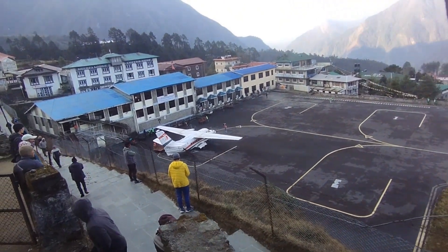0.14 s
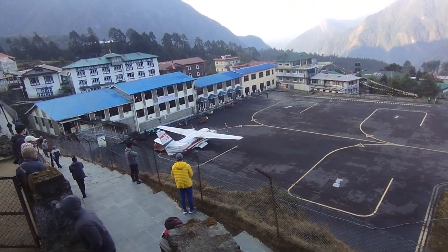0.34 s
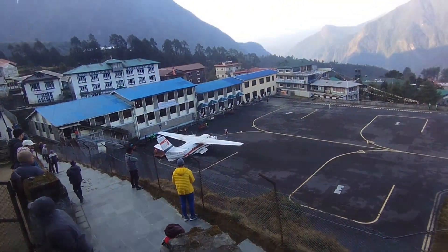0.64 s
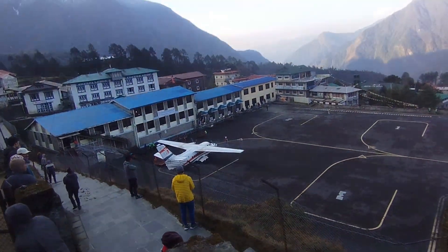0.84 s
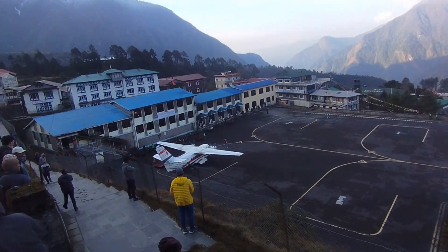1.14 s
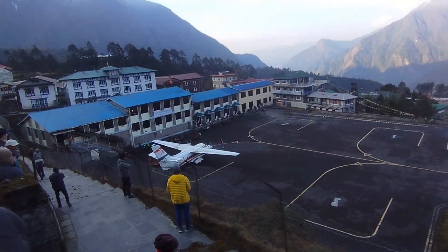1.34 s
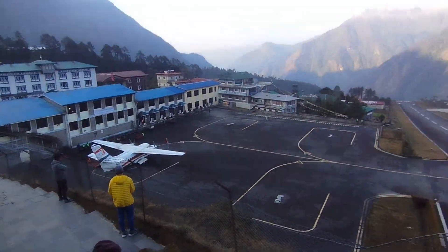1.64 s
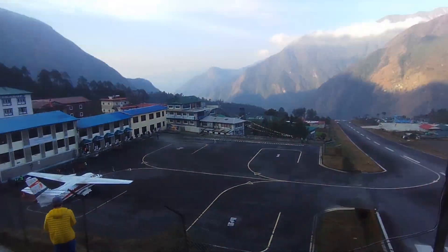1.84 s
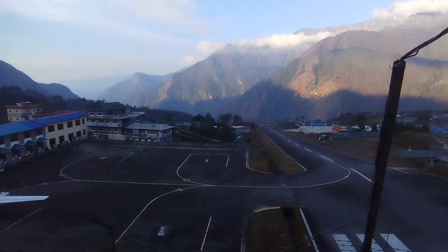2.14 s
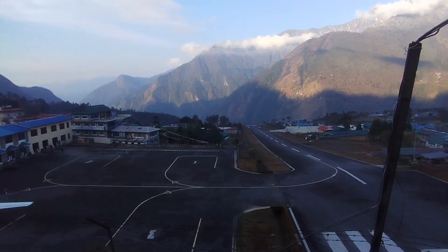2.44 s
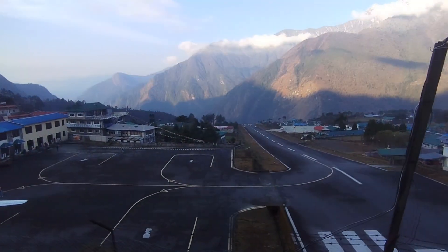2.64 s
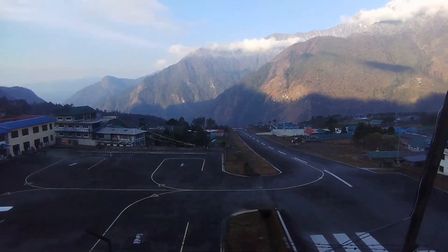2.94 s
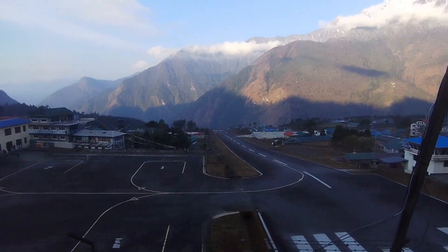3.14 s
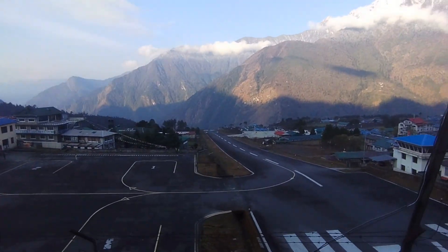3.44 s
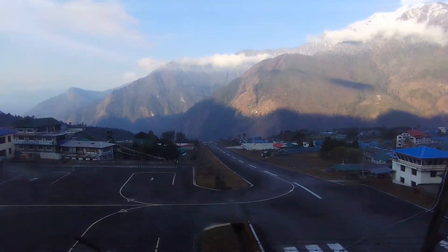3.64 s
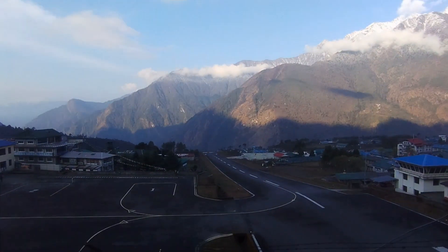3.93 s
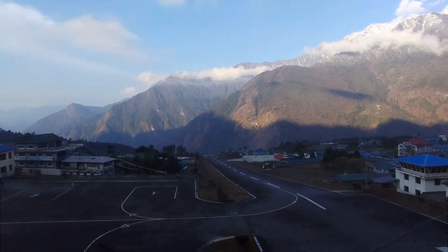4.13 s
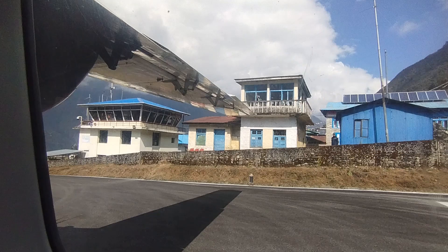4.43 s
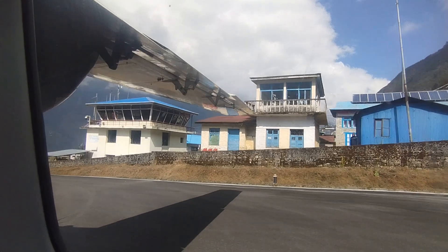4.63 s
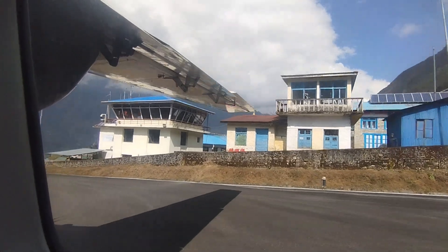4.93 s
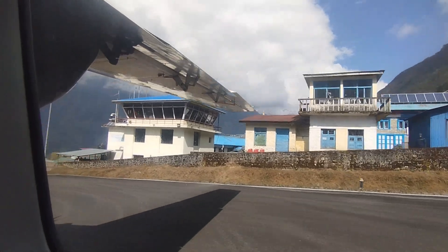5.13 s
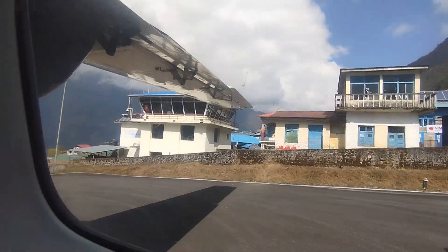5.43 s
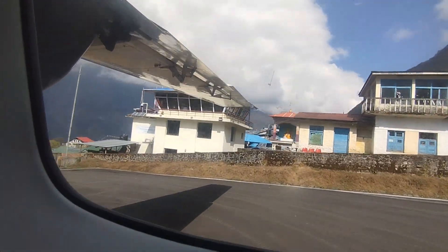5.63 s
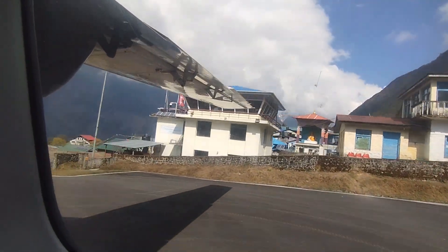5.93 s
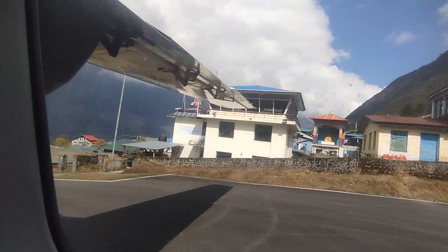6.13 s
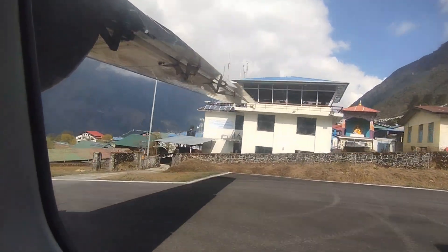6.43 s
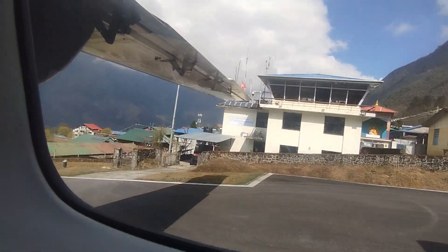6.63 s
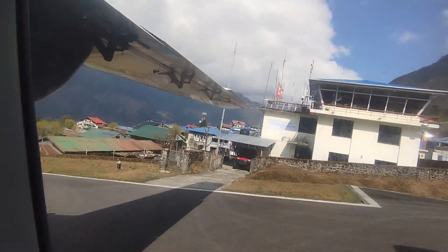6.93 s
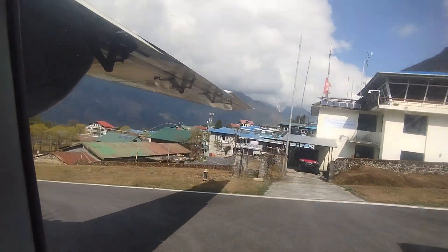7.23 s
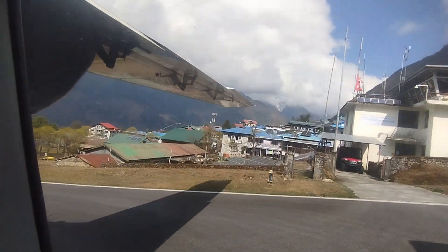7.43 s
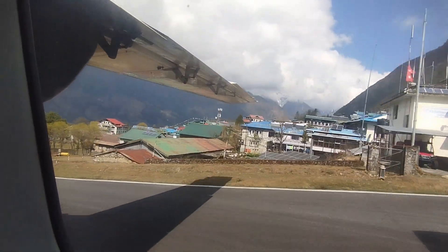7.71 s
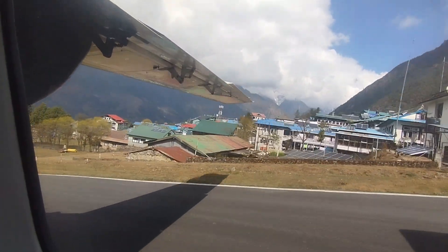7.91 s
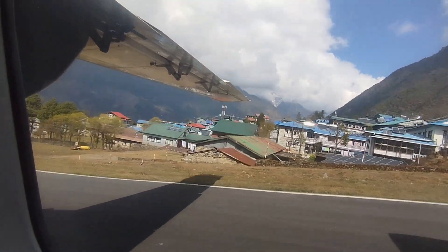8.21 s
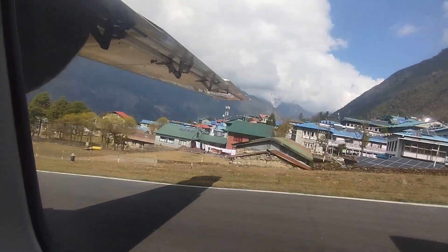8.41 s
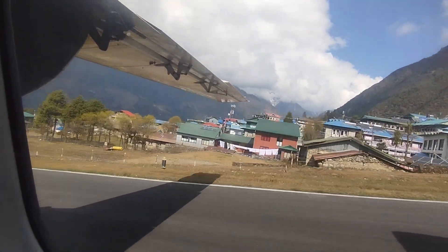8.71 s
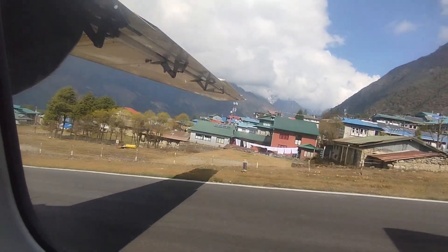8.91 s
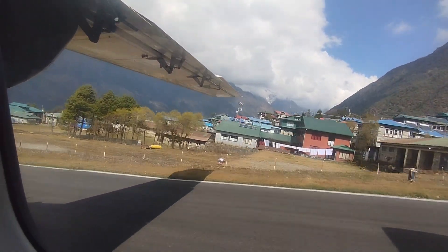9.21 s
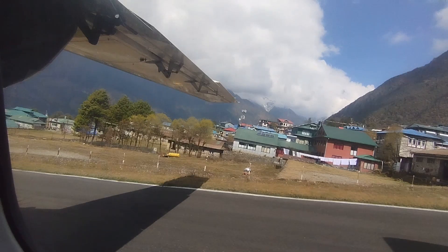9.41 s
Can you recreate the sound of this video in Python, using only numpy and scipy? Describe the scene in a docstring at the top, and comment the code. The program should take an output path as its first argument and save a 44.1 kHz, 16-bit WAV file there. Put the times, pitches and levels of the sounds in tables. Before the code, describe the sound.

A broad rushing aircraft roar on a mountain apron stops dead; after a short gap, deep propeller boom and buzz fill a taxiing cabin.

```python
"""Mountain apron, then a taxiing cabin: one turboprop heard outside and inside, two scenes.
Outside: shaped noise chopped at the blade rate, wavering blade tones and thin turbine lines;
a stereo microphone turns away. After a short silence, inside: sine shaft orders boom and buzz
over low noise, with two ticks near the start. Loud bass overloads the input."""
import sys
import numpy as np
from scipy import signal
from scipy.fft import rfft, irfft
from scipy.io import wavfile
from scipy.ndimage import uniform_filter1d

SR = 44100
rng = np.random.default_rng(int(sys.argv[2]) if len(sys.argv) > 2 else 0)


def pcm_store(signal):
    """Save signal as 16-bit PCM."""
    levels = np.round(np.clip(np.atleast_2d(signal), -1, 1) * 32767)
    wavfile.write(sys.argv[1], SR, levels.astype(np.int16).T)


N = 421596
HOP, FRAME = 512, 2048  # samples
CUT_S, RESUME_S = 4.305, 4.467  # silence between the scenes
EDGE_S = 0.002
BLADES = 5
SHAFT_HZ, OTHER_SHAFT_HZ = 34.27, 34.4  # the other propeller turns a little faster
BASS_LATE_DB, BASS_IN_S = -15, 4.615  # cabin bass is held down until then

T_S = np.arange(N) / SR
FRAME_S = np.arange(N // HOP + 5) * HOP / SR
BIN_HZ = np.fft.rfftfreq(FRAME, 1 / SR)
BIN_COLUMN_HZ = BIN_HZ[:, None]


# Cabin course: time_s, blade_tone_db, airframe_shudder_0_to_1
CABIN_COURSE = [(4.47, -6.5, 0.07), (5.0, -7.5, 0.4), (5.6, -4.5, 0.27), (6.3, -4, 0.83), (6.7, -7.5, 0.93),
                (7.3, -7, 0.77), (8.0, -6, 0.95), (8.6, -8.5, 0.84), (8.9, -4, 0.9), (9.2, -9.5, 0.7),
                (9.56, -7, 0.98)]
# Surges of twice the other blade tone: centre_s, half_length_s, rise_db
OCTAVE_SURGES = [(4.899, 0.14, 2), (5.977, 0.14, 14.5), (7.2, 0.32, 2.5), (7.905, 0.11, 12.5),
                 (8.702, 0.12, 4)]


def propeller_boom():
    """Blade-passing tone and the other propeller's octave, rocking between ports as the two drift."""
    beat_hz, beat_zero_s = 0.62, 5.3
    rock_db, mean_lean_db = 2, 0.4
    rock_rad, mean_lead_rad = 0.1, 0.11
    octave_db = -29.5
    beat = 2 * np.pi * beat_hz * (T_S - beat_zero_s) + 0.58 * wander(0.5)
    lean_db = mean_lean_db - rock_db * np.sin(beat)
    lead_rad = mean_lead_rad + rock_rad * np.cos(beat)
    blade_db = follow(CABIN_COURSE, T_S)[0]
    blade = tone(BLADES * SHAFT_HZ, blade_db, 1.2, 13, 0.24, lean_db, lead_rad)
    octave_db = octave_db + sum(swell(T_S, *row) for row in OCTAVE_SURGES)
    octave = tone(2 * BLADES * OTHER_SHAFT_HZ, octave_db, 2.1, 18.0, 0.21, lean_db, lead_rad)
    return blade + octave


# Low shaft orders in the airframe: shaft_multiple, calm_db, shuddering_db, waver_db
SHAFT_ORDERS = [(.5, -31.5, -31, 3.5), (1, -26.5, -24, -0.5), (2, -22.5, -14.5, 2.5), (3, -29, -12.5, 2),
                (4, -31.5, -23.5, 3.5), (8, -40, -33, 3)]
# Rises and dips of single orders: shaft_order_row, centre_s, half_length_s, rise_db
SHAFT_ORDER_SWELLS = [(0, 8.2, .2, 10), (0, 9.25, .25, 11), (0, 8.3, 0.23, 3.5), (1, 5.2, 0.38, 8.5),
                      (1, 7.3, .8, 7.5), (2, 5.6, 0.34, 7), (2, 6.6, 0.22, 5.5), (2, 9.1, .15, 4.5),
                      (2, 12, .2, -5), (3, 5.6, 0.24, -8.5), (3, 7.9, .2, 3.5), (3, 8.7, .12, 5.5),
                      (3, 9.05, .2, -8.5), (4, 6.5, 0.12, 6.5), (4, 7.5, .3, 6.5)]


def airframe_shudder():
    """Low shaft multiples drum on the skin, moving between calm and shuddering levels."""
    waver_hz, slip_rad, late_ramp_s = 13.0, 0.22, 0.06
    shudder = follow(CABIN_COURSE, T_S)[1]
    late_db = BASS_LATE_DB * np.clip((BASS_IN_S - T_S) / late_ramp_s + 1, 0, 1)
    total = 0
    for row, (multiple, calm_db, hard_db, waver_db) in enumerate(SHAFT_ORDERS):
        level_db = calm_db + (hard_db - calm_db) * shudder + late_db
        level_db = level_db + swells(SHAFT_ORDER_SWELLS, row, T_S)
        total = total + tone(multiple * SHAFT_HZ, level_db, waver_db, waver_hz, slip_rad)
    return total


# Course of the blade buzz: time_s, level_db
BUZZ_LEVEL = [(4.47, -42), (4.8, -31), (5.45, -29), (5.9, -33), (6.3, -39.5), (9.56, -41.5)]
# Its orders: shaft_multiple, relative_db
BUZZ_MULTIPLES = [(15, 0), (20, -9), (25, -10), (40, -23)]


def blade_buzz():
    """High blade multiples of the other propeller, reaching the ports one radian apart."""
    level_db = follow(BUZZ_LEVEL, T_S)[0]
    return sum(tone(multiple * OTHER_SHAFT_HZ, level_db + db, 2.5, 7, 0.28, lead_rad=1.0)
               for multiple, db in BUZZ_MULTIPLES)


# Apron roar level: time_s, level_db
APRON_LEVEL = [(0, -15.5), (1, -15), (2.1, -14), (2.7, -15), (3.1, -14), (3.8, -14.5), (4.3, -16.5)]
# Turn of the microphone: time_s, turn_0_to_1
MICROPHONE_TURN = [(0, 0.04), (1, 0.1), (1.6, 0.21), (2.1, 0.73), (2.8, 0.9), (4.3, 0.92)]
# Relative roar spectrum facing the aircraft: frequency_hz, density_db_per_hz
FACING_SPECTRUM = [(20, -14), (70, -1.5), (110, -8), (200, 4), (450, 0), (800, -6), (1400, -11.5),
                   (1800, -17.5), (3500, -17.5), (5500, -27.5), (7000, -31.5), (8200, -41.5),
                   (11200, -50.5), (13000, -41), (15600, -63)]
# Relative roar spectrum turned away: frequency_hz, density_db_per_hz
TURNED_SPECTRUM = [(20, -17), (60, -5.5), (110, -12), (200, 3), (450, 2), (800, -6.5), (1100, -9.5),
                   (1700, -14.5), (3000, -22.5), (5500, -24.5), (7000, -31), (8200, -45.5), (11200, -54),
                   (13000, -39), (15600, -64)]
# Steady humps and dips in the roar: centre_hz, width_hz, rise_db
ROAR_HUMPS = [(176.7, 4.5, -5), (324, 67, -5.5), (51.4, 7.3, -1.5), (124.4, 10.5, -12.5), (223, 12, -0.5),
              (9470, 960, 7.5), (14700, 990, 10)]
# Passing humps and dips: centre_hz, width_hz, centre_s, half_length_s, rise_db
APRON_BANDS = [(463, 64, 3.6, 0.4, -4), (5370, 1000, 1.9, .3, 2.3), (1100, 200, 3.23, 0.28, 4.5),
               (30, 15, .1, .3, -8), (30, 15, 2.8, .5, -6), (70, 15, 3.3, 0.38, -8.5),
               (100, 13, 0.97, 0.42, -8), (100, 20, 3., 0.36, 8), (1400, 220, 3.4, .7, -2),
               (1830, 260, 1.5, 0.7, -3), (1900, 420, 2.21, 0.21, 4.5), (804, 92, 2.95, 0.46, 5.5),
               (202, 28, 0.27, 0.37, -5), (60, 25, 1.8, 0.44, -5)]
# Surges of the throaty band: centre_s, half_length_s, rise_db
THROAT_SURGES = [(1.648, 0.12, 5), (2.65, 0.12, 6), (3.142, .17, 5), (4.05, .12, 3)]
# Stereo balance: frequency_hz, left_minus_right_db
APRON_BALANCE = [(60, 0), (1200, -.5), (2400, -4), (4400, -9.5), (6500, -11), (8600, -3), (15000, 3.5)]
# Likeness of the ports: frequency_hz, likeness_0_to_1
APRON_LIKENESS = [(60, 0.98), (300, 0.9), (700, 0.65), (1400, 0.28), (5000, 0.38), (15000, 0.47)]


def apron_roar():
    """Turbulent jet and blade noise; each blade pushes a puff, so it is chopped at the blade rate."""
    blade_hz, chop_depth = 68.4, 0.081
    throat_hz, throat_width_hz, throat_db, throat_waver_db = 640, 52, 4.5, 0.8
    lead_ms = 0.414  # left port leads by this at full turn, from 2 kHz up
    turn = np.clip(follow(MICROPHONE_TURN, FRAME_S)[0], 0, 1)
    throat_db = throat_db + throat_waver_db * np.interp(FRAME_S, T_S, wander(1.7))
    throat_db = throat_db + sum(swell(FRAME_S, *row) for row in THROAT_SURGES)

    colour_db = (1 - turn) * read(FACING_SPECTRUM, BIN_HZ) + turn * read(TURNED_SPECTRUM, BIN_HZ)
    colour_db = colour_db + sum(swell(BIN_COLUMN_HZ, *row) for row in ROAR_HUMPS)
    colour_db = colour_db + swell(BIN_COLUMN_HZ, throat_hz, throat_width_hz, throat_db)
    colour_db = colour_db + bands(APRON_BANDS, BIN_HZ, FRAME_S)

    lead_rad = 2 * np.pi * BIN_COLUMN_HZ * turn * lead_ms / 1000
    lead_rad = lead_rad * np.minimum(BIN_COLUMN_HZ / 2000, 1)  # long waves bend round the microphone
    balance_db, likeness = read(APRON_BALANCE, BIN_HZ), read(APRON_LIKENESS, BIN_HZ)
    wash = roar(colour_db, balance_db, likeness, lead_rad, patchy_db=1.0)
    chop = 1 + chop_depth * np.cos(2 * np.pi * blade_hz * T_S + 1.2 * wander(1.6))
    level_db = follow(APRON_LEVEL, T_S)[0] + 0.19 * wander(16.0)
    return wash * chop * gain_of(level_db)


# Idling blade tones: frequency_hz, usual_db
IDLE_TONES = [(136.3, -37), (205.5, -33.5), (273, -35), (541.5, -34.5), (341, -38), (616, -36), (647, -37)]
# Moments when one comes forward: tone_row, centre_s, half_length_s, rise_db
IDLE_TONE_SWELLS = [(0, 0.97, 0.66, 3.5), (0, 1.9, 0.24, 3), (1, 1.05, 0.12, 4), (1, 1.95, 0.5, 12),
                    (1, 2.92, 0.32, 12), (2, 2.0, 0.14, 12), (2, 2.65, .1, 9), (2, 3.5, 0.25, 11),
                    (2, 3.92, 0.3, 15), (3, 0.7, .15, 5), (3, 1.4, 0.59, 7), (3, 2.8, .35, 9),
                    (4, 1.95, .15, 8), (4, 4.05, .15, 8), (5, 1.62, .12, 10), (5, 2.95, .35, 11)]


def idle_blade_tones():
    """Idling blade tones, blurred a little into the roar by wavering level and slipping phase."""
    waver_db, waver_hz, slip_rad = 2.3, 6, 0.5
    return sum(tone(hz, db + swells(IDLE_TONE_SWELLS, row, T_S), waver_db, waver_hz, slip_rad)
               for row, (hz, db) in enumerate(IDLE_TONES))


# Turbine lines: frequency_hz, level_db
TURBINE_LINES = [(3413, -59), (3504, -54), (3596, -57), (5863, -63)]


def turbine_whine():
    """Thin turbine lines, each wavering by itself."""
    return sum(tone(hz, db, 2.5, 4, 0.7) for hz, db in TURBINE_LINES)


# Relative cabin roar spectrum: frequency_hz, density_db_per_hz
CABIN_SPECTRUM = [(15, -20.5), (50, -18), (85, -9), (140, -13), (190, -12.5), (290, -20), (410, -16),
                  (480, -25.5), (930, -41.5), (2000, -53.5), (3300, -65), (6500, -71), (8200, -83),
                  (11000, -88.5), (13000, -76.5), (15600, -73)]
# Passing humps and dips: centre_hz, width_hz, centre_s, half_length_s, rise_db
CABIN_BANDS = [(120, 9.9, 4.7, 0.37, -3.5), (2500, 1400, 5.6, .6, 4.5), (86, 10, 7.5, 0.33, 6.5),
               (86, 10, 7.2, 0.11, -6), (55, 10, 12, 0.53, -2.5), (275, 46, 8.6, 0.87, 3.5),
               (370, 22, 7, 4, -3)]
# Stereo balance: frequency_hz, left_minus_right_db
CABIN_BALANCE = [(300, 0.5), (1650, -2.5), (4970, -6), (15000, -1.5)]
# Likeness of the ports: frequency_hz, likeness_0_to_1
CABIN_LIKENESS = [(30, 1), (130, 0.93), (290, 0.93), (500, 0.89), (900, 0.17), (1500, 0.089), (15000, 0.15)]
# Strength of drifting patches: frequency_hz, patch_db
CABIN_PATCHES = [(400, 1.2), (1000, 2.6), (2500, 2.), (5000, 1.)]
# Short narrow holes left by lossy audio coding: frequency_hz, depth_db
CODING_HOLES = [(500, 1), (1200, 9), (3500, 11), (6000, 6)]


def cabin_roar():
    """Low airframe noise that slowly grows; lossy coding makes its hiss flutter and drop out in holes."""
    level_db, growth_db_per_s = -12, 0.28
    flutter_db, flutter_hz, flutter_above_hz = 1.7, 40, 800
    late_db = BASS_LATE_DB * (BIN_COLUMN_HZ < 110) * (FRAME_S < BASS_IN_S)
    colour_db = read(CABIN_SPECTRUM, BIN_HZ) + late_db + bands(CABIN_BANDS, BIN_HZ, FRAME_S)
    balance_db, likeness = read(CABIN_BALANCE, BIN_HZ), read(CABIN_LIKENESS, BIN_HZ)
    patchy_db, hole_db = read(CABIN_PATCHES, BIN_HZ), read(CODING_HOLES, BIN_HZ)
    wash = roar(colour_db, balance_db, likeness, 0, patchy_db, hole_db)
    highpass = signal.butter(2, flutter_above_hz, 'high', fs=SR, output='sos')
    hiss = signal.sosfilt(highpass, wash)
    wash = wash + hiss * (gain_of(flutter_db * wander(flutter_hz)) - 1)
    return wash * gain_of(level_db + growth_db_per_s * (T_S - RESUME_S))


# Two small ticks as the cabin starts: start_s, initial_envelope_db
TICK_TIMES = [(4.5226, -38), (4.583, -30)]


def small_ticks():
    """4.2 kHz bursts that die by 60 dB in 2.5 ms."""
    ticks, u_s = np.zeros(N), np.arange(200) / SR
    for start_s, level_db in TICK_TIMES:
        burst = gain_of(level_db - 60 * u_s / 0.0025) * np.sin(2 * np.pi * 4200 * u_s)
        ticks[round(start_s * SR):][:len(u_s)] += burst
    return ticks


def apron():
    """Roar, blade tones and turbine lines outside."""
    return apron_roar() + idle_blade_tones() + turbine_whine()


def cabin():
    """Shaft orders over the roar, starting low and settling; the ticks keep their own level."""
    fade_in_db, fade_in_s = -8, 0.11  # initial offset, time constant
    settle = gain_of(fade_in_db * np.exp(-np.maximum(T_S - RESUME_S, 0) / fade_in_s))
    engine = propeller_boom() + airframe_shudder() + blade_buzz()
    return (engine + cabin_roar()) * settle + small_ticks()


def tone(hz, db, waver_db, waver_hz, slip_rad, lean_db=0, lead_rad=0):
    """Sine machine line at two ports, rms level in dB; level wavers and phase slips."""
    turns = np.cumsum(hz * np.ones(N)) / SR + rng.random()
    angle = 2 * np.pi * turns + slip_rad * wander(waver_hz)
    left = gain_of(lean_db / 2) * np.sin(angle + lead_rad / 2)
    right = gain_of(-lean_db / 2) * np.sin(angle - lead_rad / 2)
    return np.sqrt(2) * gain_of(db + waver_db * wander(waver_hz)) * np.array([left, right])


def roar(colour_db, lean_db, same, lead_rad, patchy_db, hole_db=0):
    """Random spectra at two partly alike ports, drifting patches, optional lossy-coding holes; rms 1."""
    shape = (N // HOP + 5, FRAME // 2 + 1, 6)
    a, b, c, d, patches, holes = rng.standard_normal(shape).T
    patches = uniform_filter1d(patches, size=14, axis=0)
    patches = evened(uniform_filter1d(patches, size=6, axis=1))
    holes = uniform_filter1d(holes, size=3, axis=0)
    holes = evened(uniform_filter1d(holes, size=4, axis=1))
    holes = np.minimum(holes, 0)
    same = np.clip(same, -1, 1)
    left = a + 1j * b
    right = same * left * np.exp(-1j * lead_rad) + np.sqrt(1 - same ** 2) * (c + 1j * d)
    ports = np.array([left * gain_of(lean_db / 2), right * gain_of(-lean_db / 2)])
    spectra = ports * gain_of(colour_db + patchy_db * patches + hole_db * holes)
    return evened(signal.istft(spectra, nperseg=FRAME, noverlap=FRAME - HOP)[1][:, :N])


def wander(hz):
    """Smooth random curve of rms 1, its spectrum a Gaussian falling off around hz."""
    steps = N // HOP + 2
    spectrum = rfft(rng.standard_normal(steps))
    spectrum = spectrum * np.exp(-(np.fft.rfftfreq(steps, HOP / SR) / hz) ** 2)
    return np.interp(np.arange(N) / HOP, np.arange(steps), evened(irfft(spectrum, steps)))


def swell(x, centre, half_width, rise_db):
    """Bell-shaped rise in dB around a time or frequency."""
    return rise_db * np.exp(-((x - centre) / half_width) ** 2)


def swells(rows, k, t_s):
    """Sum of the swells listed for tone k, in dB."""
    return sum(swell(t_s, *row) for which, *row in rows if round(which) == k)


def bands(rows, hz, frame_s):
    """Passing rises and dips of single bands, in dB."""
    return sum(swell(frame_s, *row) * swell(hz[:, None], centre_hz, width_hz, 1)
               for centre_hz, width_hz, *row in rows)


def gain_of(db):
    """Decibels to gain."""
    return 10 ** (np.asarray(db) / 20)


def evened(x):
    """Scales to rms 1."""
    return x / np.sqrt(np.mean(abs(x) ** 2) + 1e-20)


def read(points, hz):
    """Spectrum table read on a log-frequency axis, as a column."""
    f, value = np.transpose(points)
    return np.interp(np.log(hz + 1), np.log(f + 1), value)[:, None]


def follow(rows, t_s):
    """Every value column of a time table, interpolated at t_s."""
    s, *columns = np.transpose(rows)
    return [np.interp(t_s, s, c) for c in columns]


def scene():
    """Apron, short silence with quick edges, cabin."""
    apron_gate = np.clip((CUT_S - T_S) / EDGE_S + 1, 0, 1)
    cabin_gate = np.clip((T_S - RESUME_S) / EDGE_S, 0, 1)
    return apron_gate * apron() + cabin_gate * cabin()


def record(dry):
    """Hard-knee overload with softened splatter, coupling-capacitor tilt, silent gap, band limit."""
    knee, ceiling = 12.0, 0.875
    splatter_hz, coupling_hz, band_edge_hz = 1700.0, 5.0, 15750
    driven = dry / ceiling
    limited = ceiling * driven / (1 + abs(driven) ** knee) ** (1 / knee)
    shaved = dry - limited
    held = dry - signal.filtfilt(*signal.butter(2, splatter_hz, fs=SR), shaved)
    held = signal.lfilter(*signal.butter(1, coupling_hz, 'high', fs=SR), held)
    held = held * ((T_S < CUT_S + EDGE_S) | (T_S > RESUME_S))
    lowpass = signal.firwin(1023, band_edge_hz, window=("kaiser", 9), fs=SR)
    return signal.oaconvolve(held, lowpass[None], "same")


dry = scene()
out = record(dry)
pcm_store(out)
```